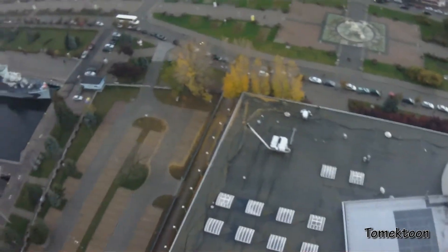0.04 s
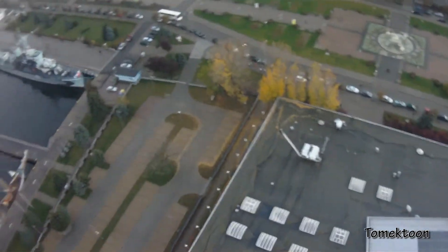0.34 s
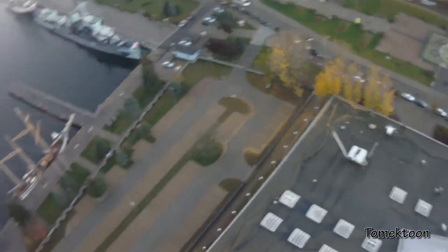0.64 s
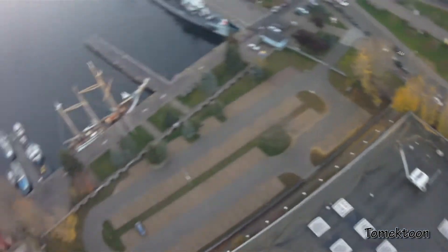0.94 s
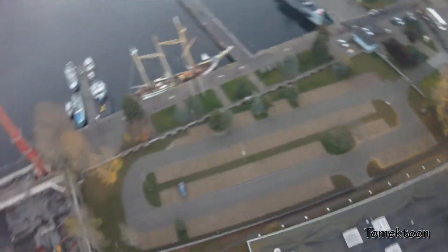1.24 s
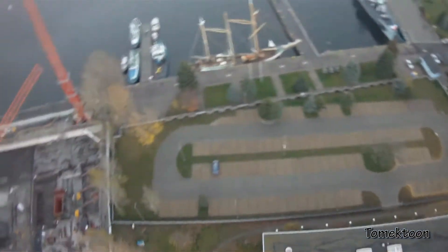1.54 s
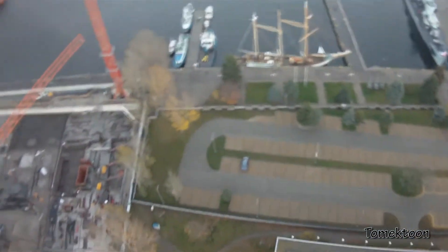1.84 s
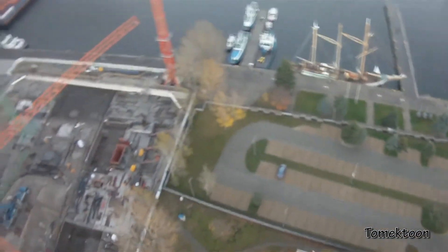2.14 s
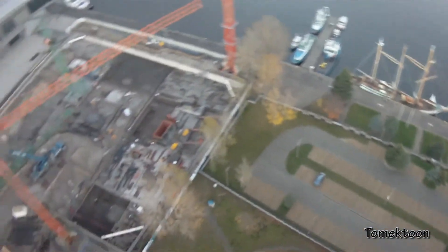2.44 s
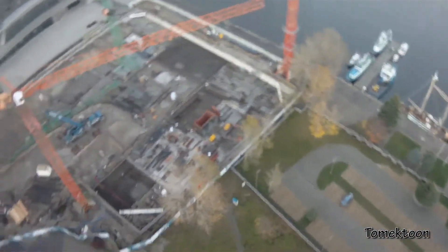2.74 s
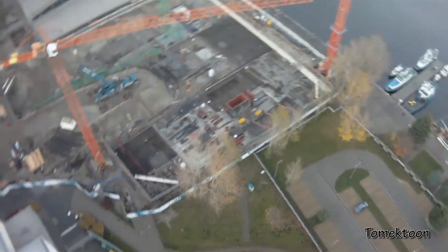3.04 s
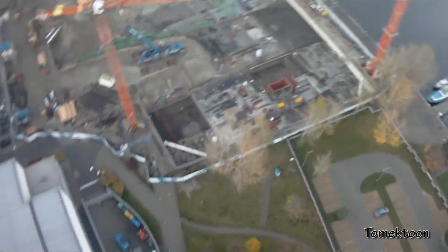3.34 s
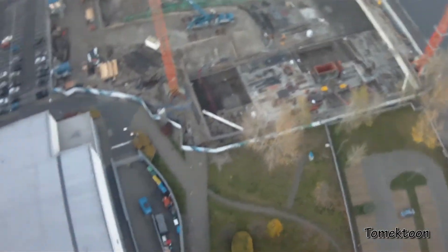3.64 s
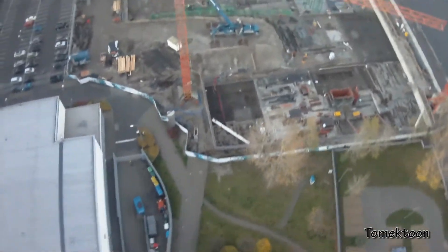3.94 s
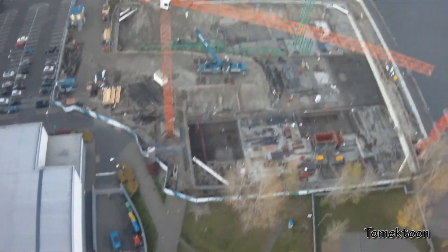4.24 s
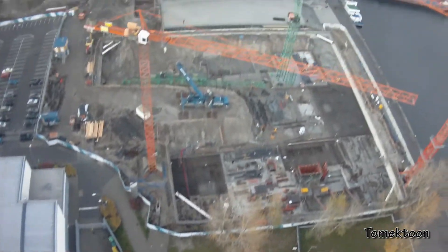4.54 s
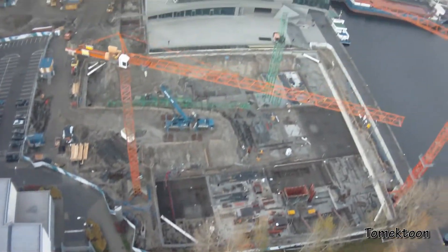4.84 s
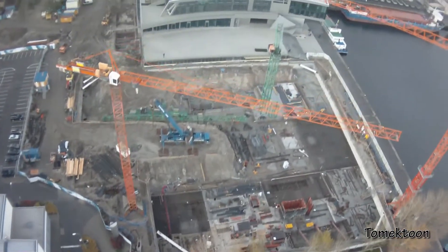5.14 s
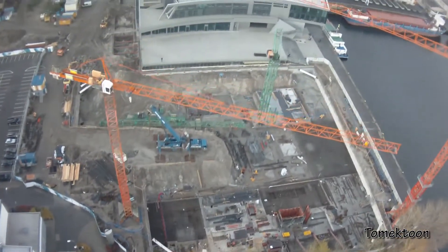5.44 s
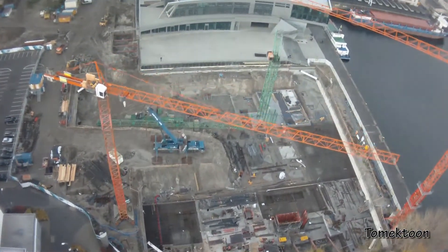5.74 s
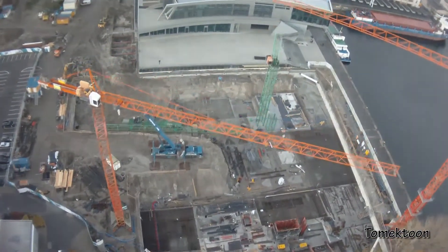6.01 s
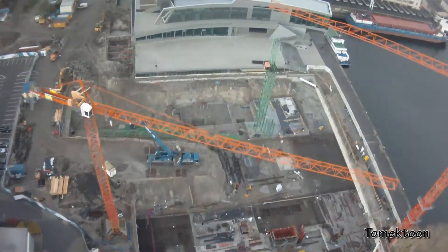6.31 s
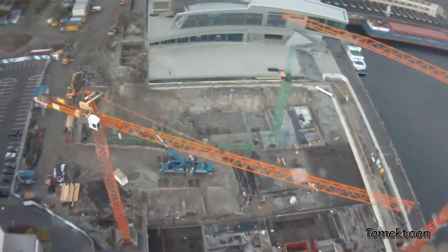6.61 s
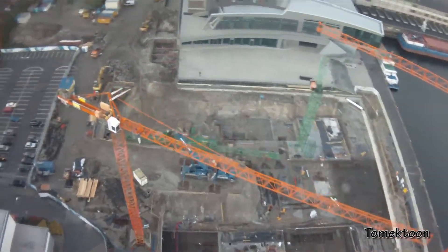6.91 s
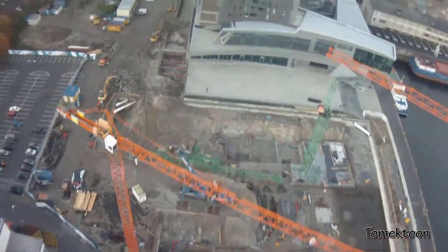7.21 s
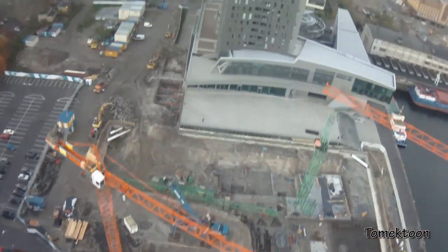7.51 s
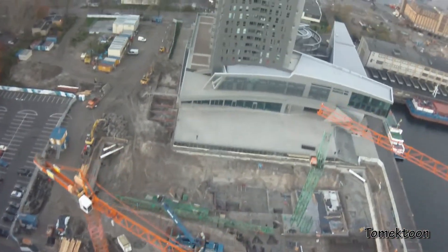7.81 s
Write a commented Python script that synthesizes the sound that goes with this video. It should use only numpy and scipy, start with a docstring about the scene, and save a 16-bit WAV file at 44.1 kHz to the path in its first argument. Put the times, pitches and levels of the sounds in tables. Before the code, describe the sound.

A small drone flies in the open air, heard from its own microphone. From the start its propellers make a close, wavering hum, several pitches beating against each other, with an airy hiss and a faint high motor whine. Wind rushes and buffets the microphone throughout, with low gusts at about 1 to 2 seconds and again around 2.5 seconds. From about 3.5 seconds the wind eases and the hum grows louder, reaching its highest pitch near 4 seconds, then gliding down and staying prominent until 5 seconds. The thin whine is a little clearer here. From about 5 seconds heavier buffeting takes over, with quick irregular spits and flutters, and the hum sits beneath it. The hiss and rush peak just before 7 seconds, followed by a deep, slightly overloaded gust. Wind and propellers continue until the end at about 8 seconds.

```python
"""High over a harbour, on the microphone of a small camera carried by a turning, drifting multicopter.
Wind buffets, rushes and spits right at the port and overloads it, so every deep gust chokes the hiss.
Close by, three propellers hum and beat as the motors trim their speeds, and the blade tips hiss.
Behind them the motors whine and the speed controllers give off a faint whistle."""
import sys
import numpy as np
from scipy import signal
from scipy.fft import rfft, irfft, next_fast_len
from scipy.io import wavfile
from scipy.ndimage import uniform_filter1d

SR = 44100
rng = np.random.default_rng(int(sys.argv[2]) if len(sys.argv) > 2 else 0)


def inscribe(sig):
    """Save sig as 16-bit PCM at rate SR to the path in sys.argv[1].

    A 1-D sig is mono; a 2-D sig holds one channel per row.
    Samples are clipped to [-1, 1] before scaling.
    """
    pcm = np.round(np.clip(np.atleast_2d(sig).T, -1, 1) * 32767)
    wavfile.write(sys.argv[1], SR, pcm.astype(np.int16))


N = 355887

# buffeting, and the slowest pressure swings, on the microphone port: (time [s], level [dB])
GUST_LEVEL = [(0, -32.5), (.9, -30), (1.16, -25.5), (1.25, -26), (1.96, -24.5), (2.07, -28.5), (2.4, -28),
              (2.49, -24), (2.92, -26.5), (3.1, -30.5), (3.67, -35.5), (3.77, -29.5), (4.3, -38.5),
              (4.63, -29.5), (4.72, -25), (5.05, -22), (5.9, -20), (6.7, -21), (6.85, -24), (7.02, -23),
              (7.12, -17.5), (7.66, -24), (8.07, -26)]
RUMBLE_LEVEL = [(0, -50), (.9, -44), (1.15, -30), (1.9, -31.5), (2.1, -44), (2.4, -50), (2.55, -36),
                (3.1, -36), (3.65, -32.5), (3.8, -28), (4.3, -38), (4.6, -33), (4.75, -24.5), (5.3, -30.5),
                (5.6, -25), (6.4, -34), (6.8, -37), (7.05, -31), (7.25, -35), (7.7, -34.5), (8.07, -28.5)]
# air past the camera: (time [s], rush [dB], hiss before choking [dB], hiss flicker spread [dB])
AIRSTREAM = [(0, -26.5, -27.5, 4), (.85, -29, -26, 2.5), (1.15, -22.5, -25.5, 4.5), (1.27, -29.5, -29, 3.5),
             (1.6, -24, -26, 2.5), (2.38, -27.5, -25, 3.5), (2.6, -28, -23.5, 2), (3.2, -22, -37, 3.5),
             (3.8, -30, -34, 2.5), (4.4, -33, -35.5, 3), (4.8, -28, -28, 2), (5.05, -33, -31, -1.5),
             (5.45, -27.5, -27, -1), (5.6, -26.5, -25.5, 1), (5.9, -28, -21, -1.5), (6.5, -27.5, -18.5, 5),
             (6.7, -24, -22.5, 2.5), (6.74, -22, -19.5, 5), (6.9, -17, -15.5, 4), (7.04, -25, -20.5, 5),
             (7.12, -30, -18.5, 1), (7.35, -27.5, -24, 4), (7.68, -25.5, -27, 2.5), (8.07, -28, -27, 3)]
# single eddies tearing across the port: (time [s], roar [dB], spit [dB], length [s])
EDDIES = [(1.219, -26.0, -31, 0.005), (1.719, -20, -33, 0.0079), (2.463, -18, -41, 0.006),
          (2.638, -20, -33, 0.005), (4.826, -23.5, -42, 0.0027), (4.894, -27, -38, 0.0061),
          (4.941, -27.5, -36, 0.0075), (4.975, -24, -42.0, 0.005), (5.003, -25, -45, 0.0053),
          (5.1, -31, -40, 0.0084), (5.111, -17, -41, 0.0053), (5.161, -24, -47, 0.0046),
          (5.188, -26.5, -49, 0.0067), (5.254, -22, -36, 0.0057), (5.276, -26, -40, 0.0054),
          (5.376, -25, -48, 0.0076), (5.47, -26.5, -38, 0.0086), (5.508, -32, -41, 0.006),
          (5.628, -26, -31, 0.0031), (5.635, -23, -40, 0.0092), (5.648, -26.5, -35, 0.0057),
          (5.718, -28, -38, 0.0075), (5.736, -24.5, -34.5, 0.009), (5.764, -25, -46, 0.008),
          (5.783, -25, -38, 0.0033), (5.804, -29, -52, 0.005), (5.835, -26.0, -37, 0.005),
          (5.863, -28, -42, 0.0083), (5.884, -24, -46, 0.006), (5.916, -25, -38, 0.0066),
          (5.972, -27.5, -35, 0.0066), (5.999, -23.5, -36, 0.007), (6.027, -25, -36.5, 0.0095),
          (6.091, -31, -36.5, 0.01), (6.152, -27, -30, 0.0048), (6.161, -23, -30, 0.0037),
          (6.215, -27, -33, 0.0073), (6.24, -32, -33, 0.0071), (6.287, -20, -29, 0.0072),
          (6.319, -27, -33.5, 0.012), (6.343, -24, -30.0, 0.0068), (6.374, -26, -36, 0.0076),
          (6.391, -24, -35, 0.0072), (6.415, -26, -33.5, 0.0096), (6.449, -22.5, -33, 0.005),
          (6.472, -31, -44, 0.0086), (6.484, -26, -34, 0.01), (6.504, -26, -35, 0.0097),
          (6.528, -23, -32, 0.0041), (6.541, -27, -32, 0.0056), (6.584, -26, -34.0, 0.0047),
          (6.621, -33, -35, 0.006), (6.683, -24, -37, 0.0059), (6.703, -27, -39, 0.015),
          (6.73, -30, -31.5, 0.0076), (6.74, -29, -28, 0.0076), (6.782, -27.0, -33.5, 0.008),
          (6.804, -26, -34, 0.0088), (6.819, -36, -37, 0.0083), (6.854, -32, -32, 0.006),
          (6.878, -32, -32.5, 0.017), (6.918, -30, -32.0, 0.0074), (6.945, -24.5, -36, 0.0093),
          (6.958, -27, -32, 0.015), (6.985, -26, -37, 0.013), (7.012, -23, -30.5, 0.0073),
          (7.088, -22, -40, 0.0085), (7.166, -29.0, -43, 0.0099), (7.214, -24.0, -39, 0.0037),
          (7.228, -24, -35, 0.0057), (7.259, -29, -44, 0.004), (7.274, -22, -36, 0.0042),
          (7.298, -23.5, -38, 0.0084), (7.33, -28.0, -36, 0.0046), (7.388, -25, -39, 0.0032),
          (7.411, -25.5, -35, 0.011), (7.435, -23, -43, 0.007), (7.447, -22, -46, 0.004),
          (7.458, -26, -36.5, 0.0074), (7.471, -24.5, -37, 0.014), (7.565, -17, -35, 0.0065),
          (7.683, -21.5, -34.5, 0.012), (7.703, -19, -28, 0.0054), (7.85, -23.5, -38, 0.0094),
          (7.911, -20, -34.0, 0.0053), (7.938, -24.0, -40, 0.0084)]
# spectra of the wind's layers at the microphone: (frequency [Hz], level [dB])
BUFFET_COLOUR = [(25, -17.5), (45, -2.5), (70, 7), (110, 5.5), (160, 0.5), (250, -4), (400, -16),
                 (900, -76.5)]
RUMBLE_COLOUR = [(10, 3.5), (22, 3.5), (40, -1.5), (58, 2.5), (90, -19.5), (200, -52)]
RUSH_COLOUR = [(60, -23), (140, 3), (250, 0.5), (400, -1.5), (700, -7.5), (1100, -13), (1800, -23),
               (3000, -38.5), (5000, -53.5)]
HISS_COLOUR = [(300, -1.5), (700, 8.5), (1200, 5), (1800, 3.5), (2700, 1.5), (3700, -0.5), (4300, -8.5),
               (5000, -18), (7000, -28.5), (9000, -33.5), (11000, -63.5)]
ROAR_COLOUR = [(150, -8), (400, 4), (800, -2.5), (1300, -10), (2000, -14.5), (4000, -54)]
SPIT_COLOUR = [(900, -14), (1600, 0), (2700, 0), (3700, -1), (4300, -7), (5000, -11.5), (7000, -17.5),
               (9000, -20), (11000, -34)]
# the propeller working hardest in the turn, and the steadier one: (time [s], blade rate [Hz], level [dB])
STEERING_ROTOR = [(0, 158, -38), (.65, 146, -36), (.97, 183, -38), (1.3, 150, -28), (1.65, 133, -32),
                  (1.95, 150, -42), (2.3, 181, -36), (2.85, 149, -31), (3.35, 168, -30), (3.58, 191, -28.5),
                  (3.7, 203, -30.5), (3.8, 213, -31.5), (4.03, 225, -26.5), (4.22, 210, -28.5),
                  (4.33, 208, -25), (4.5, 201, -24.5), (4.65, 196, -25), (4.8, 191, -28), (5.02, 188, -26),
                  (5.15, 186, -35), (5.6, 180, -36), (5.9, 176, -36), (6.2, 166, -31), (6.7, 175, -30),
                  (7.3, 160, -36), (8.07, 153, -37)]
STEADY_ROTOR = [(0, 183, -44), (.8, 185, -45), (1.25, 180, -36), (1.45, 192, -36.5), (1.8, 182, -34),
                (2.02, 185, -32), (2.28, 179, -34), (2.5, 175, -40), (3.12, 183, -42), (3.42, 175, -42),
                (3.55, 178, -30), (3.95, 181, -32), (4.35, 190, -33.5), (4.7, 189.6, -38),
                (5.22, 189.6, -44), (5.42, 181, -43), (6.1, 176, -45), (7, 175, -45), (7.2, 173.5, -43),
                (7.35, 175, -43), (7.8, 180, -44), (8.07, 178, -35)]
# harmonics of each propeller: (multiple of the blade rate, level [dB])
STEERING_HARMONICS = [(1, 0), (2, -12.5), (3, -15.5), (4, -18.5), (5, -20), (6, -19.5), (7, -25)]
STEADY_HARMONICS = [(1, -1), (2, -15.5), (3, -8), (4, -21.5), (5, -14.5), (6, -11.5), (7, -13)]
# spectrum of the blade tips' hiss: (frequency [Hz], level [dB])
BLADE_COLOUR = [(700, -2), (1200, 2.5), (1900, -4.5), (2700, -2.5), (3600, -0.5), (4300, -4), (5200, -13),
                (7000, -20), (8000, -22), (9500, -22), (11000, -58.5)]
# resonances of the airframe and the motor housing: (frequency [Hz], width [Hz], lift [dB])
FRAME_MODE = (567, 100, 7.5)
HOUSING_MODES = [(3645, 45, 7), (4350, 150, 14.5)]
# each motor's whine before the housing lifts it, and the controllers' whistle: (time [s], level [dB])
STEERING_WHINE = [(0, -63), (3.9, -61), (4.25, -54), (4.42, -50), (4.65, -53), (5.2, -58), (5.6, -54),
                  (5.9, -55), (6.2, -60), (8.07, -61)]
STEADY_WHINE = [(0, -62), (2.4, -62), (2.7, -54), (3.15, -53), (3.5, -61), (4.4, -57), (4.95, -53),
                (5.22, -53), (5.45, -56), (6.1, -61), (7, -61), (7.15, -53), (7.3, -58), (7.6, -58),
                (7.87, -50), (8.07, -55)]
WHISTLE_LEVEL = [(0, -79), (2.4, -79), (2.8, -73), (3.4, -77), (4, -74), (4.3, -68), (5.85, -69),
                 (6.1, -77), (7, -76), (7.2, -73), (8.07, -71)]


def wind():
    """Right on the microphone: buffeting, packets of small eddies that rush and hiss, single eddies."""
    rush_db, hiss_db, spread_db = curves(AIRSTREAM)
    stream = packets(rate=190, rise_s=0.00092, smooth_share=0.21, even_s=0.27)
    roar, spit, lull, front, passing = eddies()
    rush, hiss, passed = noise(RUSH_COLOUR), noise(HISS_COLOUR), choke()
    buffet = buffeting() * undb(-8 * passing) + front  # a passing eddy clears the port
    lull_db = -10 * lull  # the small eddies ease off around it
    slow_stream = packets(rate=42, rise_s=0.0072, smooth_share=0.24, even_s=0.28)
    thumps = flicker(slow_stream, spread_db=2.5 * (1 - passed) ** 2)  # in deep gusts
    rush = rush * undb(rush_db + lull_db) * thumps * flicker(stream, 0.69 * spread_db)
    hiss = hiss * undb(hiss_db + lull_db) * passed * flicker(stream, spread_db)
    return buffet + rush + hiss + noise(ROAR_COLOUR) * roar + noise(SPIT_COLOUR) * spit


def buffeting(flap_db=4, flaps_per_s=60):
    """Large eddies beat on the port over a slow rumble; in a deep gust they come in flaps."""
    gust_db, = curves(GUST_LEVEL)
    rumble_db, = curves(RUMBLE_LEVEL)
    flapping_db = flap_db * (1 - choke()) * np.tanh(walk(flaps_per_s))
    return noise(BUFFET_COLOUR) * undb(gust_db + flapping_db) + noise(RUMBLE_COLOUR) * undb(rumble_db)


def eddies(onset_share=0.65, edge_s=0.0015, front_s=0.008, front_db=-17, lull_s=0.007):
    """Each eddy grows, breaks away and trails a pressure front; gives the envelopes and the fronts."""
    roar, spit, front, passing, lull = np.zeros((5, N))
    front_n, margin = int(front_s * SR), int(lull_s * SR)
    pulse = undb(front_db) * np.sin(np.linspace(0, np.pi, front_n))
    for (start_s, roar_db, spit_db, length_s), sign in zip(EDDIES, rng.choice([-1, 1], len(EDDIES))):
        start, end = int(start_s * SR), int((start_s + length_s) * SR)
        growth = np.linspace(onset_share, 1, end - start)
        growth /= growth.mean()
        roar[start:end] += undb(roar_db) * growth
        spit[start:end] += undb(spit_db) * growth
        front[end:end + front_n] += sign * pulse
        passing[start:end] = 1
        lull[start - margin:end + margin] = 1
    roar, spit, lull = uniform_filter1d(np.array([roar, spit, lull]), int(edge_s * SR))
    return roar, spit, lull, front, uniform_filter1d(passing, front_n // 2)


def packets(rate, rise_s, smooth_share, even_s):
    """A stream of eddies that build up and break away, evened out over even_s; mean 0, spread 1."""
    kicks = (rng.random(N) < rate / SR) * rng.uniform(0.18, 1, N)
    decay = np.exp(-1 / (rise_s * SR))
    swells = signal.lfilter([1], [1, -decay], kicks[::-1])[::-1]  # a decay run backwards builds up
    stream = np.tanh(swells)  # overlapping eddies add up only so far
    stream = stream / stream.std() + smooth_share * walk(70)
    stream = stream - uniform_filter1d(stream, int(even_s * SR) + 2)
    return stream / stream.std()


def choke(knee_db=-27.5, db_per_db=1.83):
    """The share of hiss that gets through the overloaded port: the deeper the gust, the less."""
    gust_db, = curves(GUST_LEVEL)
    return (1 + undb(gust_db - knee_db) ** 2) ** (-db_per_db / 2)


def propeller(track, harmonics, wobble, wobble_rate, flutter_db, smear_rad=0.6):
    """Close blade hum: the speed jitters, uneven inflow flutters each harmonic, deep gusts smear it."""
    blade_hz, level_db = curves(track)
    passed = choke()
    phase = phase_of(blade_hz * (1 + wobble * walk(wobble_rate)))
    phase += smear_rad * (1 - passed) ** 2 * walk(30)
    hum = 0
    for k, harmonic_db in harmonics:
        strength = undb(harmonic_db) * resonance(k * blade_hz, FRAME_MODE) * flicker(walk(24), flutter_db)
        if k > 1:
            strength *= passed ** 0.12  # gusts choke the overtones a little
        hum += strength * np.sin(k * phase + rng.uniform(0, 2 * np.pi))
    return np.sqrt(2) * undb(level_db) * hum


def blade_hiss(depth=0.22, reference_db=-32.5, reference_hz=200, db_per_octave=6):
    """Turbulence shed by the blade tips, growing with their speed and swelling once per passing blade."""
    blade_hz, _ = curves(STEERING_ROTOR)
    level_db = reference_db + db_per_octave * np.log2(blade_hz / reference_hz)
    swell = 1 + depth * np.cos(phase_of(blade_hz))
    return noise(BLADE_COLOUR) * undb(level_db) * choke() * swell


def motor_whine(track, level, wobble, steps_per_blade=21, fold_hz=4000):
    """A motor's commutation tone, locked to its propeller; the housing rings as it sweeps a mode."""
    blade_hz, _ = curves(track)
    level_db, = curves(level)
    whine_hz = steps_per_blade * blade_hz * (1 + wobble * walk(160))
    heard_hz = fold_hz - np.abs(fold_hz - whine_hz)  # the camera folds higher tones back down
    housing = np.prod([resonance(whine_hz, mode) for mode in HOUSING_MODES], axis=0)
    flutter = flicker(walk(24), spread_db=3)
    return np.sqrt(2) * undb(level_db) * housing * flutter * np.sin(phase_of(heard_hz))


def controller_whistle(switching_hz=7950, depth=0.9):
    """The speed controllers' thin switching tone; the blades' load adds a side tone above and below."""
    blade_hz, _ = curves(STEADY_ROTOR)
    level_db, = curves(WHISTLE_LEVEL)
    load = 1 + depth * np.cos(phase_of(blade_hz))
    return np.sqrt(2) * undb(level_db) * load * np.sin(2 * np.pi * switching_hz * np.arange(N) / SR)


def resonance(hz, mode):
    """The gain that a mode of the aircraft gives a tone of this pitch."""
    centre_hz, width_hz, lift_db = mode
    return undb(lift_db / (1 + (2 * (hz - centre_hz) / width_hz) ** 2))


def noise(colour):
    """Noise of rms 1 with the given spectrum, falling away below its lowest frequency."""
    hz, db = np.transpose(colour)
    size = next_fast_len(N)
    bin_hz = np.arange(size // 2 + 1) * SR / size + 1e-3
    gain = undb(np.interp(np.log(bin_hz), np.log(hz), db)) * np.minimum(bin_hz / hz[0], 1)
    shaped = irfft(rfft(rng.standard_normal(size)) * gain, size)[:N]
    return shaped / shaped.std()


def walk(rate):
    """Random levels held 1 / rate seconds and smoothed; spread 1."""
    hold = max(int(SR / rate), 2)
    steps = np.repeat(rng.standard_normal(N // hold + 1), hold)
    smooth = uniform_filter1d(uniform_filter1d(steps, hold), hold // 2)[:N]
    return smooth / smooth.std()


def flicker(motion, spread_db):
    """A gain that follows motion by spread_db and roughly keeps the mean power."""
    nepers = spread_db * np.log(10) / 20
    return np.exp(nepers * motion - nepers ** 2)


def curves(table):
    """The columns of a timed table, joined by straight lines, one value per sample."""
    times, *columns = np.transpose(table)
    return [np.interp(np.arange(N) / SR, times, column) for column in columns]


def phase_of(hz):
    """The running phase of a changing frequency, in radians."""
    return 2 * np.pi * np.cumsum(hz) / SR


def undb(db):
    """Decibels to gain."""
    return 10 ** (np.asarray(db) / 20)


def scene():
    """Mono, on board: three propellers and their drives, under the wind at the microphone."""
    # the opposite propeller follows the steering one, slightly slower and quieter
    partner_track = [(s, hz * 0.965, db - 13) for s, hz, db in STEERING_ROTOR]
    hum = propeller(STEERING_ROTOR, STEERING_HARMONICS, wobble=0.007, wobble_rate=40, flutter_db=2.2)
    hum += propeller(partner_track, STEERING_HARMONICS, wobble=0.01184, wobble_rate=8, flutter_db=3.5)
    hum += propeller(STEADY_ROTOR, STEADY_HARMONICS, wobble=0.007, wobble_rate=35, flutter_db=2.5)
    motors = motor_whine(STEERING_ROTOR, STEERING_WHINE, wobble=0.0055)
    motors += motor_whine(STEADY_ROTOR, STEADY_WHINE, wobble=0.004)
    return (hum + motors + controller_whistle() + blade_hiss() + wind())[None]


def record(dry):
    """The microphone saturates softly; its port and the camera dull the treble and cut the top."""
    ceiling = undb(-17.35)
    saturated = ceiling * np.tanh(dry / ceiling)
    port_rolloff = signal.bessel(4, 6930, norm="mag", fs=SR, output="sos")
    camera_rolloff = signal.butter(3, 6200, fs=SR, output="sos")
    top_cut = signal.ellip(8, 0.1, 70, 11500, fs=SR, output="sos")
    return signal.sosfilt(np.vstack([port_rolloff, camera_rolloff, top_cut]), saturated)


dry = scene()
out = record(dry)
inscribe(out)
```